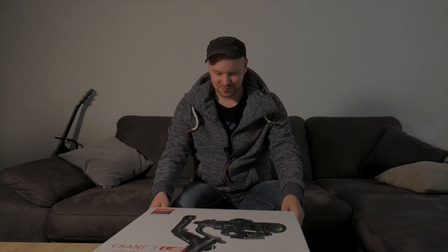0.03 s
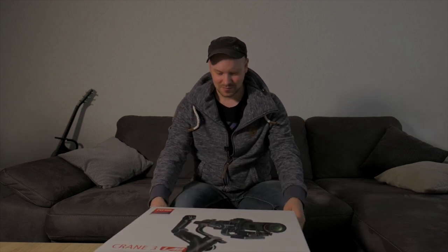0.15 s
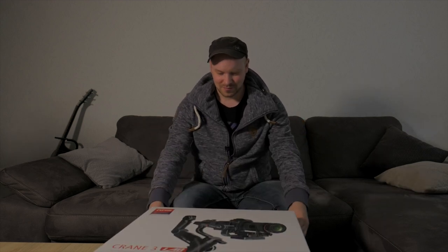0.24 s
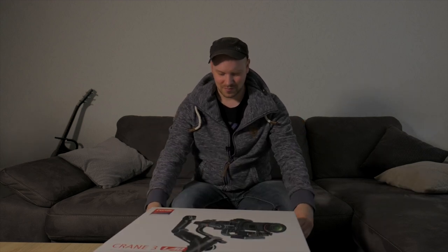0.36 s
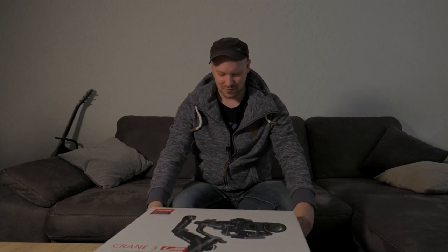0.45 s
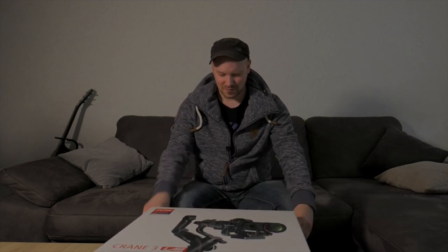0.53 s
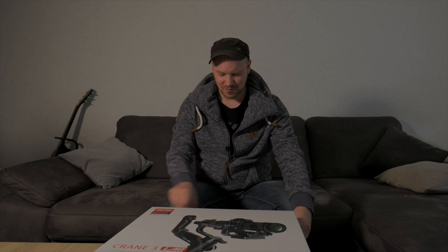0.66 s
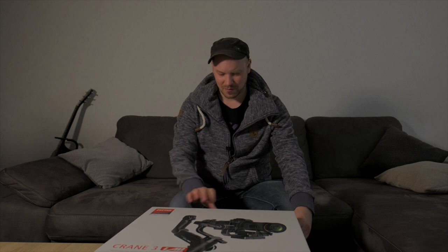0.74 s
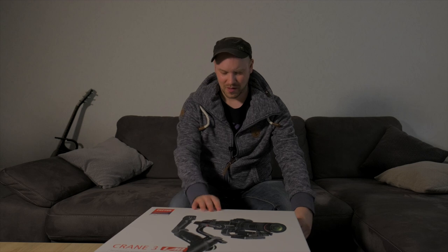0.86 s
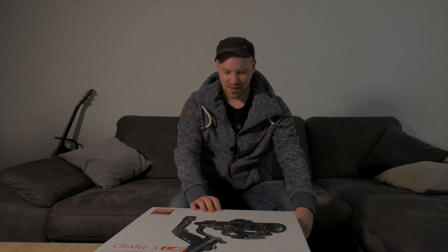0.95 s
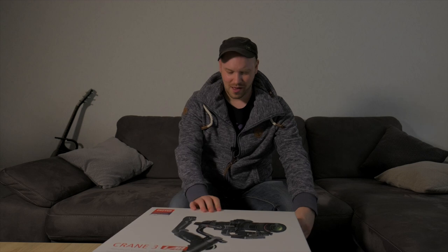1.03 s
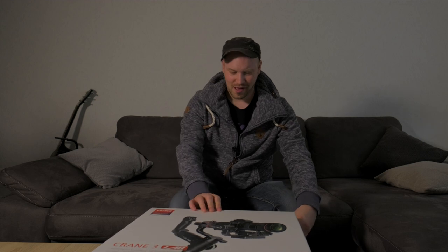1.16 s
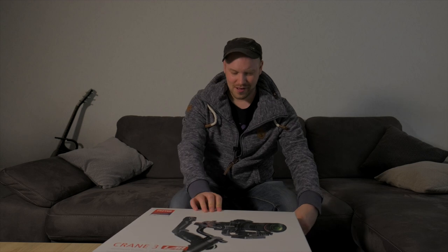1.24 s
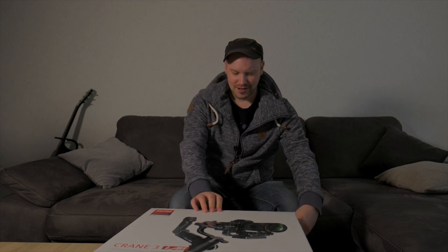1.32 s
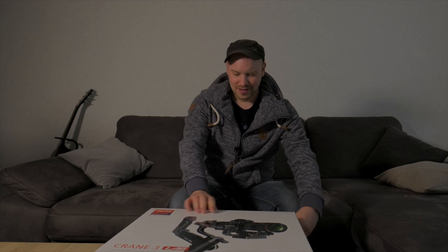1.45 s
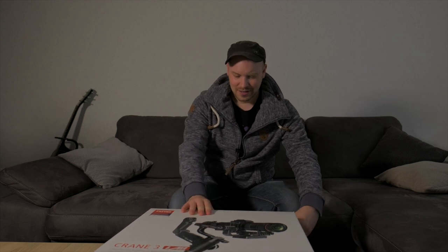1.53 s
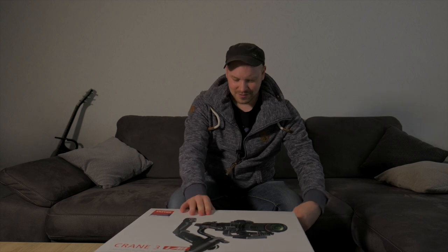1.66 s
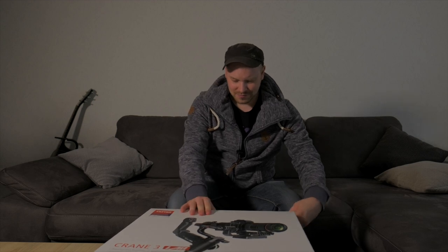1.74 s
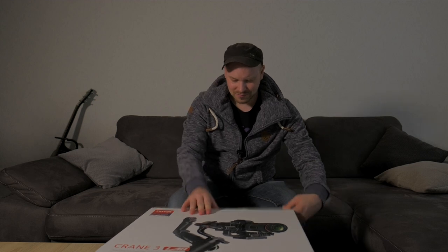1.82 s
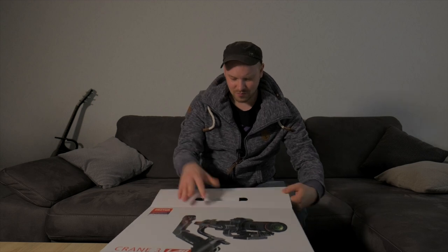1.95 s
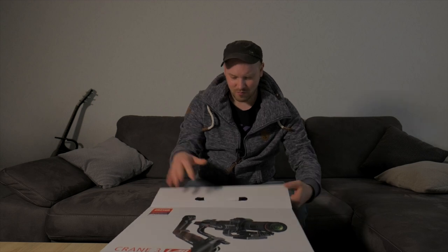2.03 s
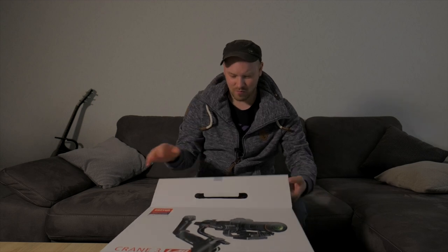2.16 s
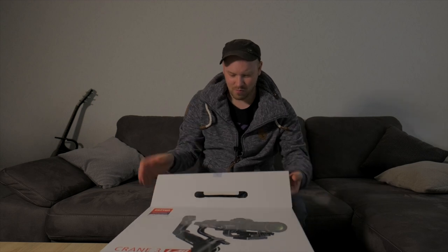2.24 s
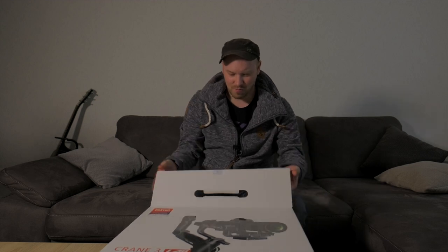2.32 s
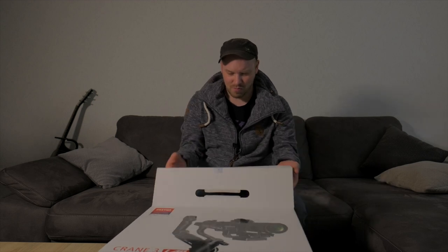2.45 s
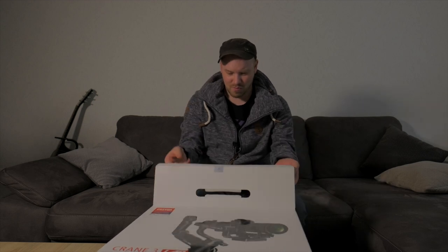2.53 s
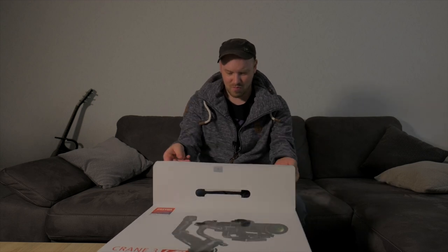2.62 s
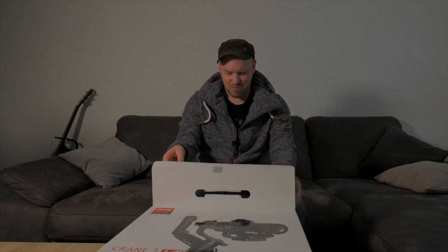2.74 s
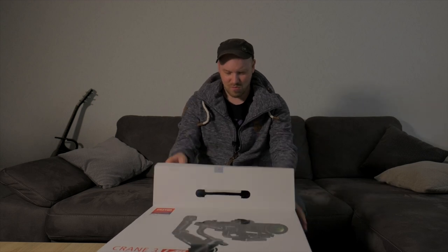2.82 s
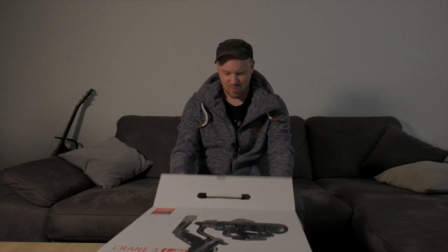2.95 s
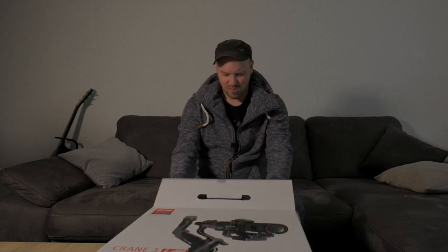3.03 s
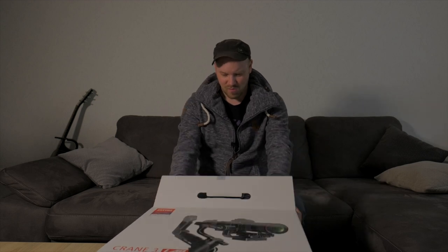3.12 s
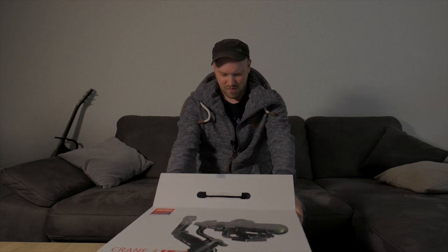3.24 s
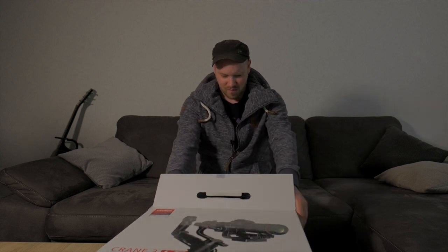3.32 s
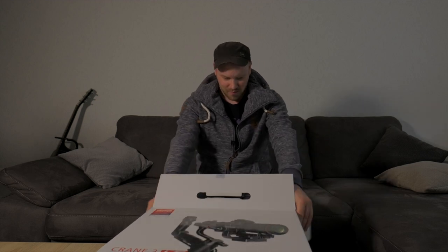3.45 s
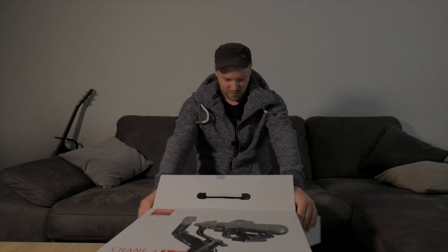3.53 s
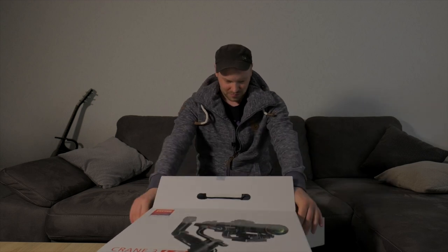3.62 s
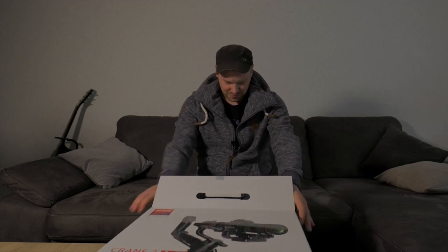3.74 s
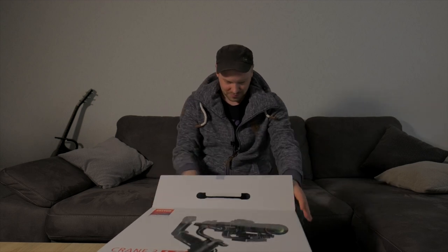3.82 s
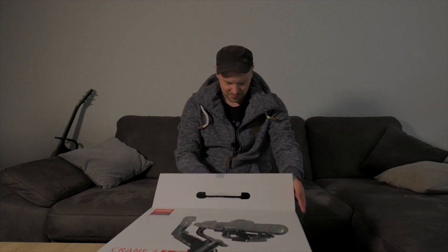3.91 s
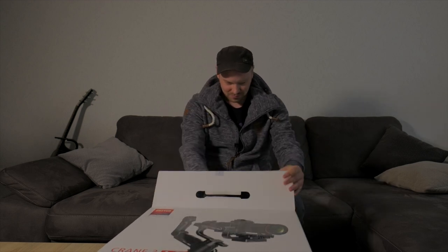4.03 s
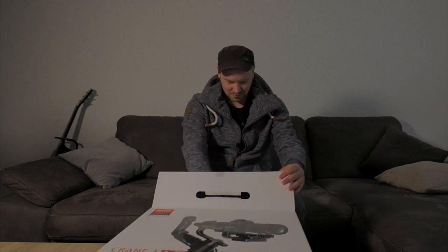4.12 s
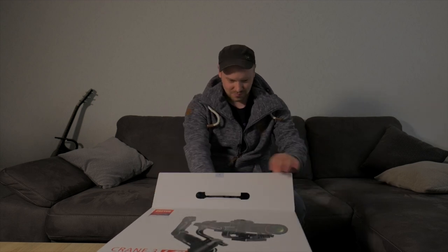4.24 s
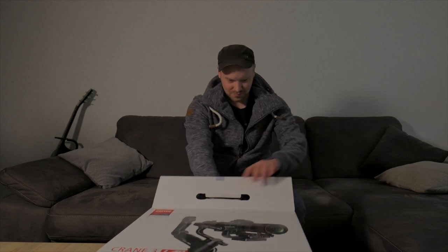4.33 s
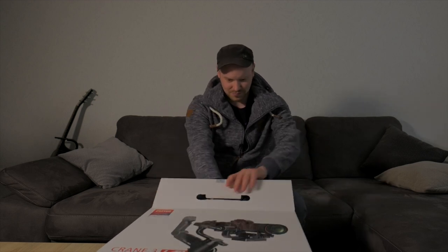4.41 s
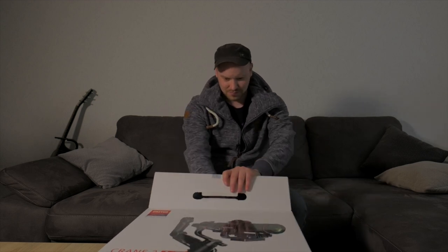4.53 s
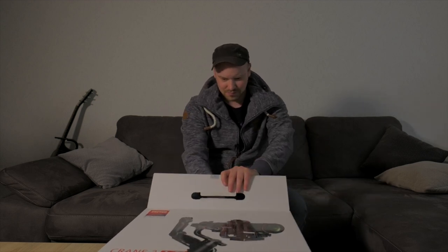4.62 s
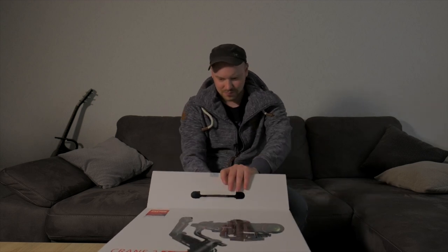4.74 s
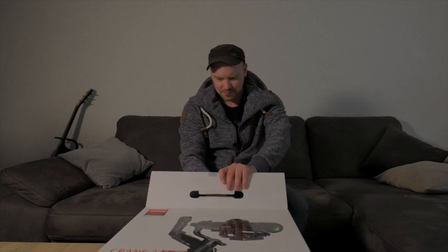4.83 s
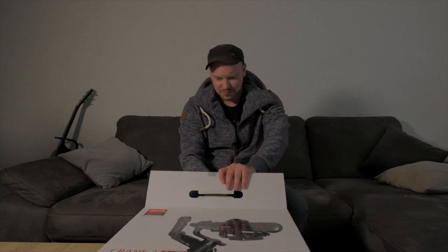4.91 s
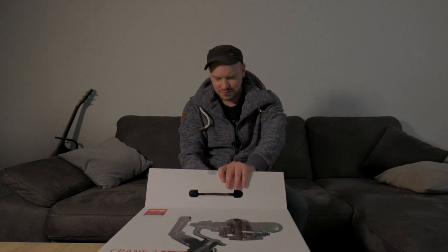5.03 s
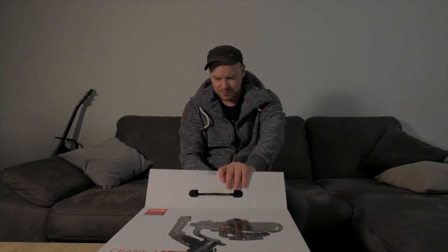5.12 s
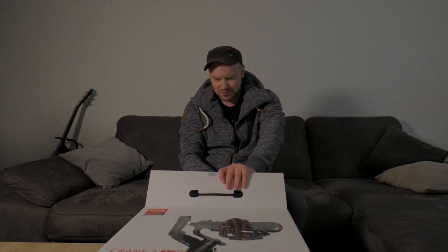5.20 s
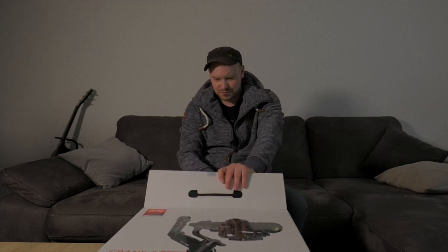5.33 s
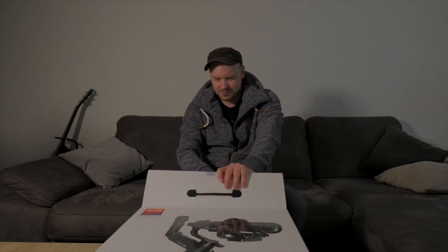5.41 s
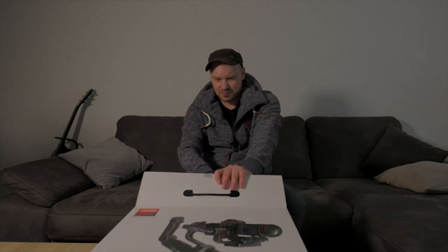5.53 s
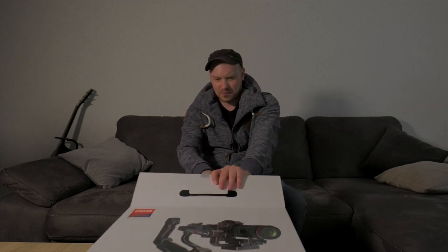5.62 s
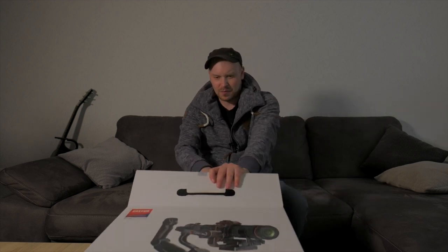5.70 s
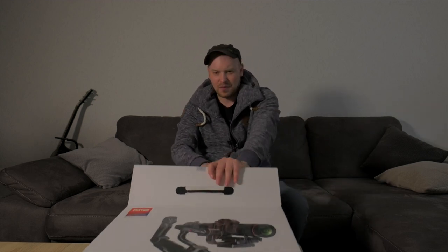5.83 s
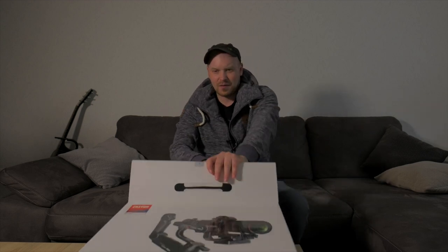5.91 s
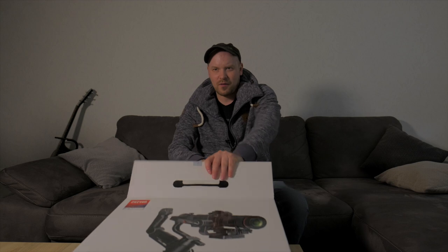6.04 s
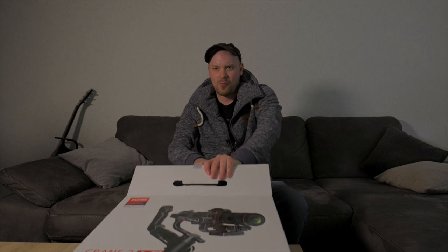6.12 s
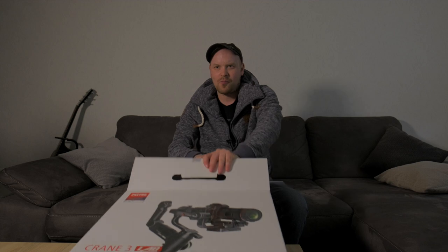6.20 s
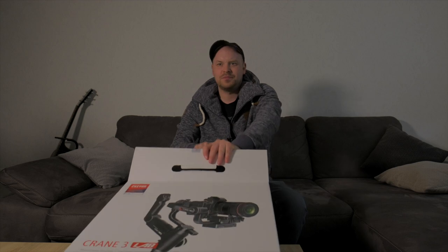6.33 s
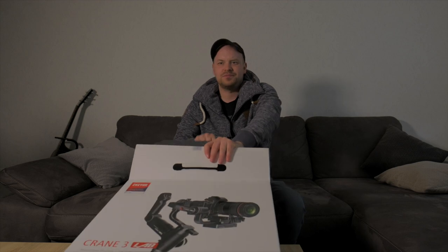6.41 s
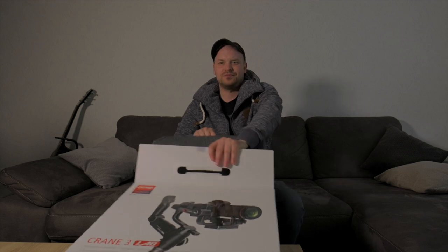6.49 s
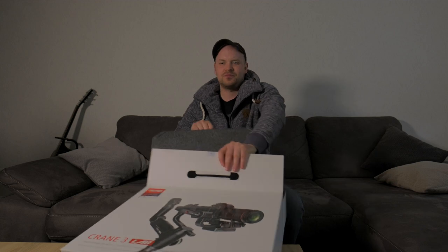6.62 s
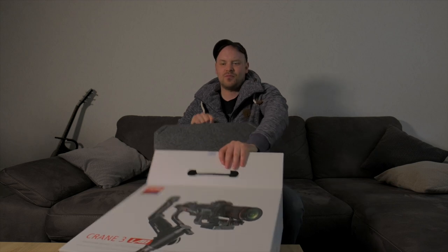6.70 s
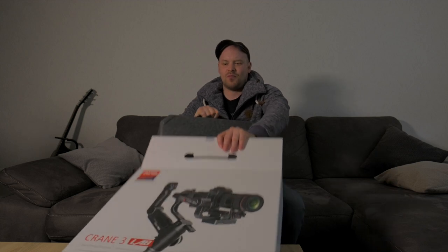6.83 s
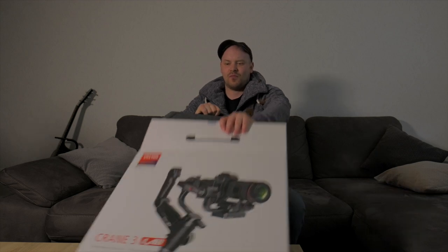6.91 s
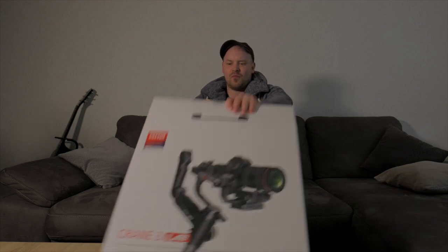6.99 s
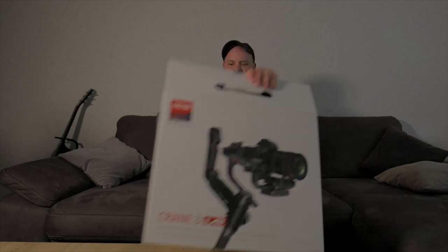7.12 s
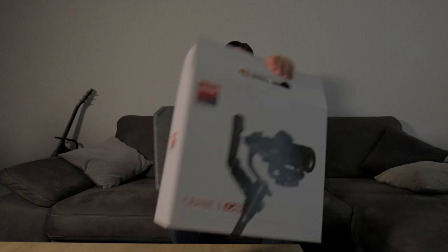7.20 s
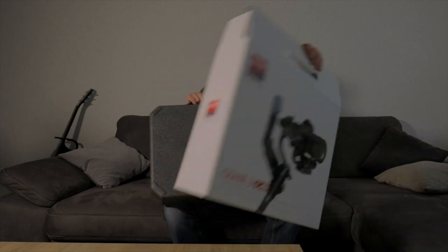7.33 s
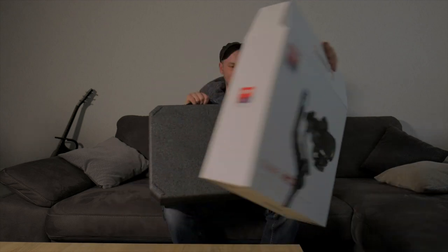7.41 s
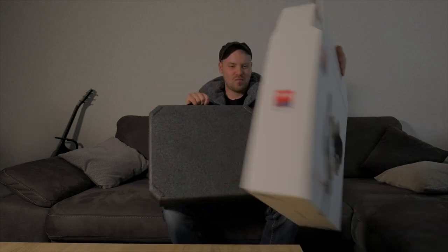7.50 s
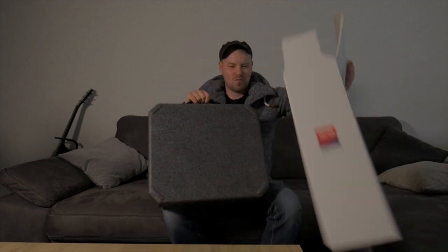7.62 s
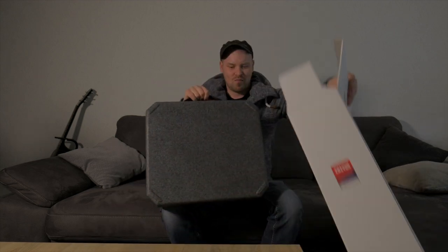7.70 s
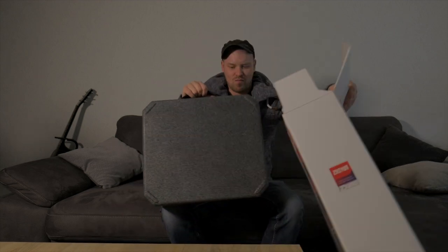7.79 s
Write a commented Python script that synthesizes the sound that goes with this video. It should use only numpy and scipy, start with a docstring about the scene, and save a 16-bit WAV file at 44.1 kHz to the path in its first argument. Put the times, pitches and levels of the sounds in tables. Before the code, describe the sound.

In a quiet living room, fingers tap and scuff a large cardboard box, pulling at its tab until it snaps free with a loud hollow crack. Flaps fold with small papery ticks, then a foam case drags out with rising hissy friction and the box drops with a deep hollow thump. Fairly close microphone, short room echo.

```python
"""A large cardboard box is opened on a table in a quiet living room: fingers work the tab until it snaps free,
flaps are folded out, and a foam case is dragged from the box, which drops back hollow on the table.
Rubbing and strokes are uneven noise split into hiss, scrape and panel boom; knocks ring decaying sines of
panel, box and table; snaps are filtered noise bursts; creases pop as tiny sines, a finger squeaks faintly.
Random decaying tails give the echoes, over low shaking and steady room tone."""
import sys
import numpy as np
from scipy import signal
from scipy.fft import rfft, irfft, next_fast_len
from scipy.io import wavfile
from scipy.ndimage import uniform_filter1d, map_coordinates

SR = 44100
rng = np.random.default_rng(int(sys.argv[2]) if len(sys.argv) > 2 else 0)


def log_audio(samples):
    """Write samples as a 16-bit WAV file to the path given in sys.argv[1]."""
    # one column per channel
    frames = np.atleast_2d(samples).T
    # limit to full scale, then quantise
    limited = np.clip(frames, -1, 1)
    pcm = np.round(limited * 32767).astype(np.int16)
    wavfile.write(sys.argv[1], SR, pcm)


N = 346405

# steady rubbing, nominal levels: start_s, hiss_db, scrape_db, boom_db
RUBBING = [(0.0, -67.5, -66.5, -59.5), (0.57, -77, -75, -62), (0.83, -77, -79, -76.5),
           (1.49, -84, -77.5, -63), (1.97, -71, -67, -51), (2.3, -81, -82.5, -71.5),
           (3.23, -66.5, -65.5, -65), (3.76, -69, -74, -70), (4.02, -67, -60.5, -57.5),
           (4.37, -64.5, -71, -69.5), (4.61, -61, -62.5, -63), (4.92, -53, -56.5, -53),
           (5.2, -54, -55.5, -66.5), (5.57, -57.5, -59.5, -57.5), (5.88, -51.5, -58, -56.5),
           (6.16, -61, -66.5, -62), (6.49, -59, -58.5, -54.5), (6.67, -45, -62, -54),
           (6.95, -65.5, -62.5, -51), (7.37, -74, -72, -57.5), (7.54, -77, -75.5, -73),
           (7.85, -87.5, -85, -72)]
# modes of the box, nominal: centre_hz, width_hz, level_db
BOX_MODES = [(305, 43, 1), (530.7, 34, -2), (1165, 6.3, -8.5), (1800, 30, -10.5), (2012, 29, -26.5),
             (2258, 220, -16), (2350, 41, -14.5), (2500, 160, -25), (2980, 110, -20), (3940, 34, -24),
             (4160, 14, -27.5), (3880, 8.7, -33.5)]
# relative spectrum of the scrape: freq_hz, level_db
SCRAPE_SPECTRUM = [(470, -35), (800, -5.5), (859, -3.5), (1250, -6.5), (2160, -6.5), (3370, -5), (3690, -6),
                   (7650, -12), (9000, -13), (11700, -42.5), (19800, -120)]
# relative spectrum of the panel boom: freq_hz, level_db
BOOM_SPECTRUM = [(47, -51), (80, -13), (107, -16), (150, 2.5), (206, -2.5), (283, 4.5), (320, -6), (414, 3),
                 (485, -2), (793, -6.5), (1500, -15), (1950, -55.5), (3300, -120)]


def amp(db):
    """Gain of a level in dB."""
    return 10 ** (np.asarray(db) / 20)


def unit(x):
    """x at rms 1."""
    return x / np.sqrt(np.mean(x ** 2) + 1e-20)


def along(points, hz):
    """(Hz, value) points read on a log frequency axis."""
    point_hz, value = np.transpose(points)
    return np.interp(np.log(hz + 1), np.log(point_hz + 1), value)


def curves(rows):
    """One value per sample for each column after the time."""
    time_s, *columns = np.transpose(rows)
    return [np.interp(np.arange(N) / SR, time_s, column) for column in columns]


def wobble(rate_hz, count=N):
    """Smooth random curve of count samples, rate_hz knots a second."""
    knots = rng.standard_normal(int(count * rate_hz / SR) + 4)
    return map_coordinates(knots, [np.arange(count) * rate_hz / SR])


def filtered(x, response):
    """x times a response of frequency, zero-padded."""
    size = next_fast_len(len(x) + SR // 4)
    spectrum = rfft(x, size) * response(np.fft.rfftfreq(size, 1 / SR))
    return irfft(spectrum, size)[:len(x)]


def resonance(hz, centre_hz, width_hz):
    """Response of one damped mode, 1 at its centre."""
    return 1j * hz * width_hz / (centre_hz ** 2 - hz ** 2 + 1j * hz * width_hz)


def coloured(x, spectrum):
    """x given a spectrum, at rms 1."""
    return unit(filtered(x, lambda hz: amp(along(spectrum, hz))))


def grit(count, spread_db, stutter_db, rate_hz):
    """Fibres catching: noise whose samples have uneven sizes and come in clumps."""
    clumps = wobble(rate_hz, count)
    level_db = spread_db * rng.standard_normal(count) + stutter_db * clumps
    return amp(level_db) * rng.standard_normal(count)


def hiss_centre(time_s):
    """Centre of the hiss in Hz; it sinks and returns as the foam case slides free."""
    # start_s, lowest_s, end_s, lowest_hz
    foam_out = (6.56, 6.76, 6.88, 10300)
    usual_hz = 12270
    return np.interp(time_s, foam_out[:3], (usual_hz, foam_out[3], usual_hz))


def background():
    """Table and air shaken by handling, swelling as the box lurches, over steady room tone."""
    # relative spectrum of the shaking: freq_hz, level_db
    rumble = [(12, -14), (30, -1.5), (55, -0.5), (85, -5), (130, -12), (200, -47.5)]
    # relative spectrum of room tone and hiss: freq_hz, level_db
    quiet = [(47, -34), (80, -4), (114, -7), (149, -12.5), (199, -6), (422, -17.5), (527, -16),
             (958, -19.5), (13100, -43.5), (16000, -39.5)]
    # lurches of the box on the table: peak_s, swell_db
    jolts = [(1.79, -50.5), (2.1, -54), (3.3, -65), (5.99, -59), (6.901, -32), (7.2, -59)]
    shake_db, quiet_db = -70.5, -79
    shake_db_per_boom_db = 0.13
    rise_s, fall_t60_s = 0.05, 0.45  # a swell climbs 25 dB in rise_s
    shake = coloured(amp(1.7 * wobble(5.3)) * rng.standard_normal(N), rumble)
    t = np.arange(N) / SR
    boom_db = curves(RUBBING)[2]
    gain = amp(shake_db + shake_db_per_boom_db * (boom_db - boom_db.mean()))
    for peak_s, swell_db in jolts:
        drop_db = np.where(t < peak_s, 25 * (peak_s - t) / rise_s, 60 * (t - peak_s) / fall_t60_s)
        gain = gain + amp(swell_db - drop_db)
    return gain * shake + amp(quiet_db) * coloured(rng.standard_normal(N), quiet)


def rubbing():
    """Skin, foam and cardboard slide on cardboard: hiss with a moving centre, scrape, panel boom."""
    hiss_db, scrape_db, boom_db = curves(RUBBING)
    hz, t, z = signal.stft(grit(N, spread_db=3.5, stutter_db=2.6, rate_hz=15), SR, nperseg=512)
    log_offset = np.log(hz[:, None] / hiss_centre(t) + 1e-6)
    hump = amp(-np.minimum(90 * log_offset ** 2, 40))  # broad, on a log axis
    hump /= np.sqrt(np.mean(hump ** 2, axis=0))
    hiss = unit(signal.istft(z * hump, SR, nperseg=512)[1][:N])
    scrape = coloured(grit(N, spread_db=1.0, stutter_db=0.76, rate_hz=64), SCRAPE_SPECTRUM)
    # slips set the panels going
    boom = coloured(grit(N, spread_db=5.5, stutter_db=-2.0, rate_hz=19), BOOM_SPECTRUM)
    return amp(hiss_db) * hiss + amp(scrape_db) * scrape + amp(boom_db) * boom


def patchy(x, depth_db):
    """x with patches of random gain in time and frequency: the contact keeps changing."""
    z = signal.stft(x, nperseg=512)[2]
    field = uniform_filter1d(rng.standard_normal(z.shape), size=7, axis=0)
    field = uniform_filter1d(field, size=9, axis=1)
    return signal.istft(z * amp(depth_db * unit(field)), nperseg=512)[1][:N]


def moving():
    """Gain of the rubbing: full, dipping while the hands rest."""
    # rests of the hands, nominal: start_s, end_s, change_db
    pauses = [(2.775, 2.852, -4), (3.233, 3.29, -7.5), (4.233, 4.289, -6.5), (5.553, 5.696, -6),
              (3.776, 3.808, -4), (6.856, 6.855, -9)]
    t = np.arange(N) / SR
    ramp_s = 0.027
    change_db = np.zeros(N)
    for start, end, db in pauses:
        change_db += db * np.clip(np.minimum(t - start, end - t) / ramp_s + .5, 0, 1)
    return amp(change_db)


def scuffs():
    """Short strokes: one friction force feeds the hiss, the scrape and the panel under the hand."""
    # start_s, end_s, swell_db (rise over the stroke), hiss_db, scrape_db, scrape_hz, boom_db, panel_hz
    strokes = [(0.0, 0.07, -11, -76, -61, 2000, -60, 400), (0.178, 0.196, 21.5, -85, -72, 2090, -57, 370),
               (0.329, 0.365, 6, -56.5, -48, 1360, -43.5, 560),
               (0.367, 0.421, -12, -62.5, -65, 1860, -58, 437),
               (0.456, 0.502, -3, -57.5, -54.5, 1630, -56, 610),
               (0.616, 0.662, 7.5, -59, -54, 1560, -39, 500), (0.69, 0.82, 8, -93, -80.5, 1950, -65.5, 505),
               (0.795, 0.816, -5, -77, -70, 1990, -68, 470), (0.911, 0.967, -2, -74, -76, 3700, -78, 400),
               (1.035, 1.044, -0.5, -83, -74, 2680, -40.5, 220),
               (1.048, 1.146, -9, -74, -69.5, 2050, -56.5, 430),
               (1.141, 1.261, 9, -64.5, -59, 1850, -55, 570), (1.26, 1.267, -3, -69, -49, 2120, -63, 577),
               (1.58, 1.65, -12, -65.5, -69.5, 2580, -77, 453),
               (1.86, 1.873, -1.5, -46, -45, 2400, -31.5, 454),
               (1.897, 2.043, -9, -81, -66, 2400, -46.5, 436),
               (2.058, 2.084, -7.5, -57.5, -59, 3000, -47.5, 210),
               (2.411, 2.424, -13, -72.5, -70, 1900, -66.5, 344),
               (2.452, 2.685, 0.5, -79.5, -75, 1487, -71.5, 298),
               (2.853, 2.921, -5, -67, -74.5, 2380, -64, 375),
               (3.009, 3.123, 11, -62.5, -82, 1900, -82.5, 379),
               (3.112, 3.158, 14, -54, -55.5, 3130, -62, 458),
               (3.176, 3.179, 2, -58, -66.5, 3200, -54, 204),
               (3.282, 3.296, 12.5, -55, -61.5, 3280, -76, 240),
               (3.671, 3.768, 0.5, -68.5, -73, 2380, -72, 300),
               (3.804, 3.824, 0, -68.5, -63, 1380, -64.5, 453),
               (3.929, 4.206, -5.5, -60.5, -66, 1504, -67, 340),
               (4.328, 4.349, 5, -75.5, -63.5, 2560, -69.5, 367),
               (4.811, 4.912, -2, -52, -51.5, 2160, -49.5, 330),
               (5.03, 5.38, 6.5, -54, -61, 2870, -63, 326), (5.875, 6.005, -2, -71, -54, 2240, -46, 413),
               (6.418, 6.519, 18, -50.5, -50.5, 2600, -39.5, 380),
               (6.528, 6.617, 2, -44.5, -55, 3120, -56.5, 285),
               (6.618, 6.815, 2, -45, -50, 4300, -57.5, 306),
               (6.738, 6.802, -5, -45, -64, 3830, -42.5, 312),
               (6.871, 6.89, 10, -72, -50, 2130, -33.5, 300),
               (7.201, 7.266, -9.5, -87, -80, 1620, -46, 318),
               (7.446, 7.516, -5, -66, -69, 2540, -56.5, 339)]
    gritty_s = 0.13  # longer strokes stutter less
    attack_s, ease_per_db = 0.0018, 0.01  # fade-in grows by this share of the length per dB of swell
    fade_t60_s, fade_share = 0.022, 0.3  # fade-out grows by this share of the length
    out = np.zeros(N + SR)
    t = np.arange(SR // 2) / SR
    for start, end, swell_db, hiss_db, scrape_db, scrape_hz, boom_db, panel_hz in strokes:
        length_s = end - start
        stutter_db = 3.5 / (1 + length_s / gritty_s)
        force = grit(len(t), spread_db=5.0, stutter_db=stutter_db, rate_hz=160)

        fade_in_s = attack_s + ease_per_db * max(swell_db, 0) * length_s
        stroke = amp(swell_db * (t / length_s - .5)) * np.clip(t / fade_in_s, 0, 1)
        fade_out_s = fade_t60_s + fade_share * length_s
        fade = amp(swell_db / 2 - 60 * (t - length_s) / fade_out_s)
        shape = np.where(t < length_s, stroke, fade)

        hiss_hz = hiss_centre((start + end) / 2)

        def hiss_response(hz):
            return resonance(hz, hiss_hz, .5 * hiss_hz + 500) ** 2

        def scrape_response(hz):
            return resonance(hz, scrape_hz, 1.3 * scrape_hz) ** 2 + 0.33 * amp(along(SCRAPE_SPECTRUM, hz))

        def boom_response(hz):
            return resonance(hz, panel_hz, panel_hz) ** 2 + 0.12 * amp(along(BOOM_SPECTRUM, hz))

        stroke_sound = amp(hiss_db) * unit(filtered(force, hiss_response))
        stroke_sound += amp(scrape_db) * unit(filtered(force, scrape_response))
        stroke_sound += amp(boom_db) * unit(filtered(force, boom_response))
        out[round(start * SR):][:len(t)] += shape * stroke_sound
    return out[:N]


def room(x, count=40):
    """Diffuse echoes: noise tails with a decay per frequency, a new tail for each of count time blocks."""
    # decay of the room: freq_hz, t60_s
    decay = [(100, 0.39), (500, 0.37), (2000, 0.39), (6000, 0.26), (15000, 0.13)]
    out, step = np.zeros(N + SR), N // count + 1
    for k in range(count):
        hz, t, z = signal.stft(rng.standard_normal(SR // 2), SR, nperseg=256)
        fall = amp(-60 * t / along(decay, hz)[:, None])
        tail = signal.istft(z * fall, SR, nperseg=256)[1]
        echo = signal.fftconvolve(x[k * step:(k + 1) * step], tail / np.linalg.norm(tail))
        out[k * step + 300:][:len(echo)] += echo  # delayed 300 samples
    return out[:N]


def knocks():
    """Each knock rings the struck panel, the box modes near its pitch, and the table."""
    # nominal: start_s, level_db, panel_hz, table_db (against level_db)
    hits = [(0.223, -51, 620, -14), (0.342, -32, 672, -29), (0.496, -43, 624, -20), (0.56, -46, 230, -12),
            (0.625, -42.5, 574, -7.5), (0.648, -39, 594, -28), (1.043, -38.5, 138, -26),
            (1.233, -43.5, 558, -17.5), (1.553, -36, 610, -15), (1.582, -40, 600, -35),
            (1.659, -42.5, 188, -10), (1.737, -54, 505, -13), (1.779, -26, 253, -27),
            (1.784, -12, 570, -23), (1.797, -20, 355, -32), (2.079, -30, 132, -29.5),
            (2.091, -32, 148, -18.5), (2.287, -57.5, 895, -7.5), (2.513, -47.5, 384, -25),
            (2.597, -46, 248, -10.5), (3.353, -45, 1370, -18), (3.352, -44, 867, -23),
            (3.377, -46.5, 288, -8.5), (3.918, -37, 290, -37), (4.832, -41, 180, -12),
            (5.939, -32.5, 432, -17.5), (6.225, -41.5, 884, -29), (6.254, -54.5, 700, -30),
            (6.487, -30, 415, -38), (6.743, -30.5, 421, -15.5), (6.893, -15, 201, -10.5),
            (6.903, -19.5, 289, -9.5), (6.929, -23, 319, -38), (7.2, -37.5, 294, -8),
            (7.332, -44.5, 282, -13), (7.419, -48, 388, -18)]
    # modes of the table under the box: freq_hz, level_db, t60_s
    table_modes = [(40, -1, .15), (63, -7.5, 0.05), (97, -5, 0.064), (140, 5.5, .18)]
    middle_hz, middle_t60_s, pitch_power = 300, 0.045, 0.32  # higher panels ring shorter
    out, t = np.zeros(N + SR), np.arange(SR // 3) / SR
    modes_hz, widths_hz, modes_db = np.transpose(BOX_MODES)
    luck = rng.standard_normal((len(hits), len(BOX_MODES)))
    table = sum(amp(db - 60 * t / t60) * np.sin(2 * np.pi * hz * t) for hz, db, t60 in table_modes)
    decays = np.exp(-2.5 * np.pi * np.outer(widths_hz + modes_hz / 30, t))
    ringing = decays * np.sin(2 * np.pi * np.outer(modes_hz, t))
    box_attack = (1 - np.exp(-t / 0.00083)) ** 2
    table_attack = 1 - np.exp(-t / 0.0011)
    for (start, level_db, panel_hz, table_db), chance in zip(hits, luck):
        t60 = middle_t60_s * (middle_hz / panel_hz) ** pitch_power
        panel = amp(-60 * t / t60) * np.sin(2 * np.pi * panel_hz * t)
        octaves_off = np.abs(np.log2(modes_hz / panel_hz))
        body = amp(4 + 0.43 * modes_db + 4.8 * chance - 7.7 * octaves_off) @ ringing
        blow = (panel + body) * box_attack + amp(table_db - 7) * table * table_attack
        # every knock starts 1.5 ms after its start_s
        out[round((start + .0015) * SR):][:len(t)] += amp(level_db + 3.5) * blow
    return out[:N]


def snaps():
    """Paper edges snap: noise bursts with a papery middle, upper box modes and a bright crack."""
    # nominal: start_s, level_db, bright_db (against level_db), paper_hz
    edges = [(0.342, -31, -13, 1360), (0.5625, -44.5, -17, 2300), (1.035, -39.5, -10, 3020),
             (1.0438, -31, -17, 1570), (1.0875, -48, -20, 5830), (1.2672, -43, -13, 2330),
             (1.5862, -42.5, -15, 2870), (1.657, -46, -2.5, 2720), (1.7856, -11.5, -7, 1760),
             (1.7872, -4, -26, 1950), (1.85, -34, -13, 2570), (2.07, -33.5, -5.5, 2870),
             (2.183, -55, -4.5, 2394), (2.4079, -57.5, -10, 2405), (2.6009, -50, -8, 2504),
             (2.8599, -45.5, -8.5, 2770), (3.0386, -45.5, -8.5, 1334), (3.1509, -36, -6, 3200),
             (3.182, -41, -2.5, 3150), (3.2778, -53.5, 6, 3400), (3.3033, -46, -13, 3280),
             (3.3436, -47, -28, 6350), (3.3571, -40.5, -13, 1346), (3.4148, -49, -13, 3320),
             (3.5927, -55.5, 3.5, 3000), (3.7243, -46, -3, 1320), (3.9208, -39, -3, 3830),
             (4.3378, -46.5, -10, 2440), (4.6287, -46, -3, 3770), (4.7082, -42, -5, 3860),
             (4.8283, -27, -29, 1450), (5.165, -51, -27, 3440), (6.2256, -37, -32, 1310),
             (6.2847, -50, -21, 3800), (6.5171, -24, -7, 1930), (6.8958, -25, -13, 2020),
             (6.915, -28.5, -5, 1490), (6.9636, -40.5, -6, 3100), (7.4814, -47.5, -22.5, 3060)]
    out, t = np.zeros(N + SR), np.arange(SR // 8) / SR
    noise = rng.standard_normal((len(edges), len(t)))

    def upper_modes(hz):
        return sum(amp(0.3 * db) * resonance(hz, c, 4.4 * w) for c, w, db in BOX_MODES if c > 1000)

    for (start, level_db, bright_db, paper_hz), burst in zip(edges, noise):
        burst = burst * amp(level_db + 0.5) * (1 - np.exp(-t / 0.00032))

        def papery(hz):
            own = 1.5 * resonance(hz, paper_hz, 0.24 * paper_hz)
            return own + 0.53 * resonance(hz, 2800, 4000) + 0.22 * upper_modes(hz)

        def bright(hz):
            return amp(bright_db + 8) * resonance(hz, 12500, 13000) ** 2

        middle = burst * amp(-60 * t / 0.016)
        crack = burst * amp(-60 * t / 0.0091)  # over sooner
        out[round(start * SR):][:len(t)] += filtered(middle, papery) + filtered(crack, bright)
    return out[:N]


def crackle(per_s=45, lowest_db=-66, spread_db=14):
    """Tiny creases pop at random while tab and flaps are bent: decaying sines, each at its own pitch."""
    # bending of tab and flaps: start_s, end_s
    folding = (1.25, 3.85)
    count = int(per_s * (folding[1] - folding[0]))
    when, pitch, size = rng.random((count, 3)).T
    t = np.arange(160) / SR
    hz = 1800 * amp(16 * pitch)[:, None]
    gain = amp(lowest_db + spread_db * size)[:, None]
    pops = gain * np.exp(-.45 * hz * t) * np.sin(2 * np.pi * hz * t)
    first = (np.interp(when, (0, 1), folding) * SR).astype(int)
    at = first[:, None] + np.arange(len(t))
    return np.bincount(at.ravel(), pops.ravel(), N)


def squeak():
    """Faint thin tone under the pulling finger: a sine of fuzzy pitch and level that sags a little."""
    # nominal: start_s, end_s, pitch_hz, level_db
    pull = (1.42, 1.57, 1500, -75)
    start, end, hz, level_db = pull
    done = np.clip((np.arange(N) / SR - start) / (end - start), 0, 1)
    pitch_hz = hz * (1.01 - .02 * done) + 30 * wobble(200)
    gain = amp(level_db + 4.7 * wobble(37.8)) * np.sin(np.pi * done) ** 0.27
    return gain * np.sin(2 * np.pi * np.cumsum(pitch_hz) / SR)


def scene():
    """Hits and strokes with their echoes, creases, squeak, rubbing and background."""
    knock, snap, scuff = knocks(), snaps(), scuffs()
    dull_knock = filtered(knock, lambda hz: 1 / (1 + 1j * hz / 700))
    echoes = room(amp(-6.0) * dull_knock + amp(-12.0) * snap + amp(-14.0) * scuff)
    hits = knock + snap + scuff + echoes
    small = crackle() + squeak()
    rub = amp(-0.5) * moving() * patchy(rubbing(), depth_db=1.68)
    return (hits + small + rub + background())[None]


def record(dry):
    """Band limit: gain falls to zero over the last 120 Hz below top_hz."""
    top_hz = 15850
    return filtered(dry[0], lambda hz: np.clip((top_hz - hz) / 120, 0, 1) ** 2)[None]


dry = scene()
out = record(dry)
log_audio(out)
```